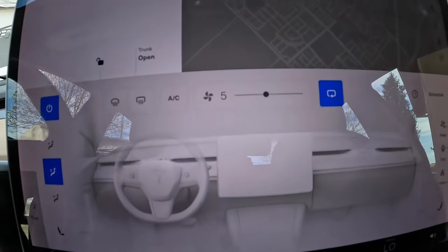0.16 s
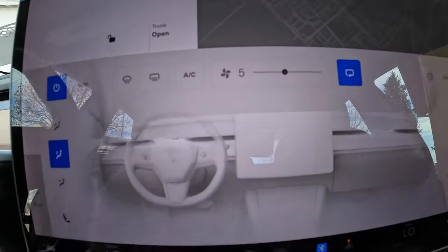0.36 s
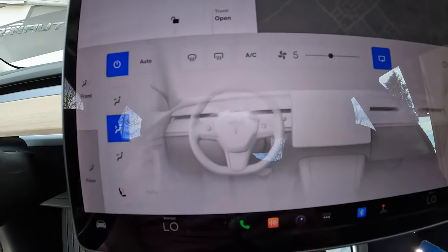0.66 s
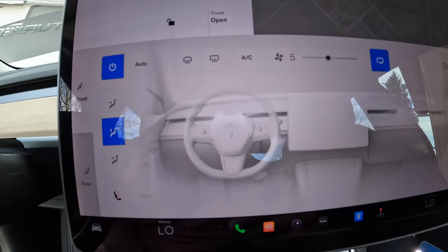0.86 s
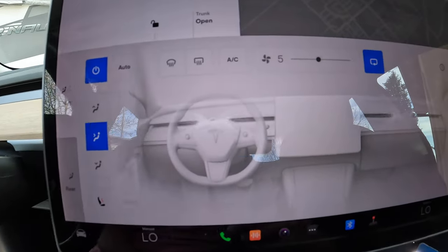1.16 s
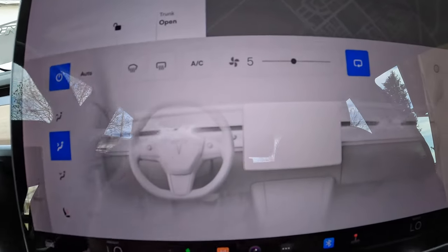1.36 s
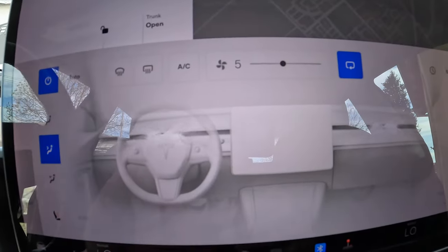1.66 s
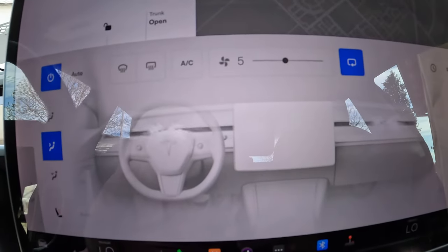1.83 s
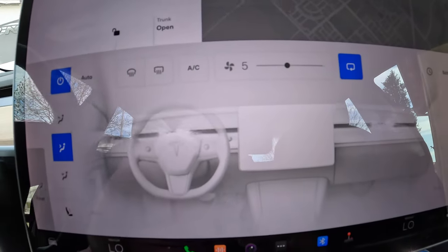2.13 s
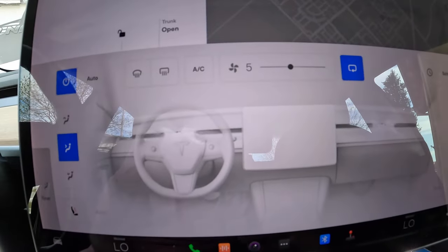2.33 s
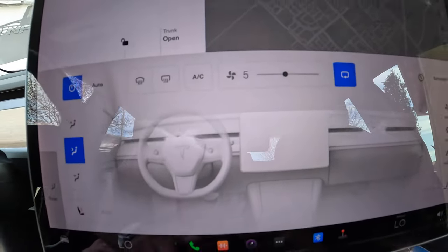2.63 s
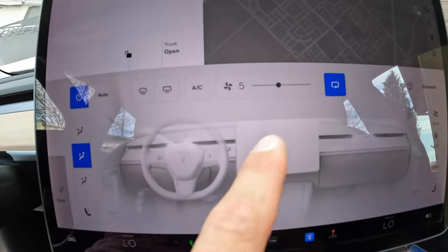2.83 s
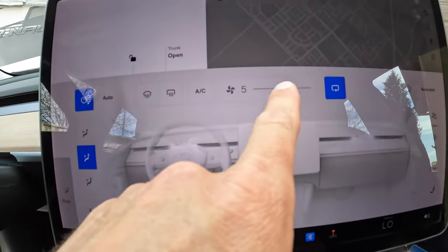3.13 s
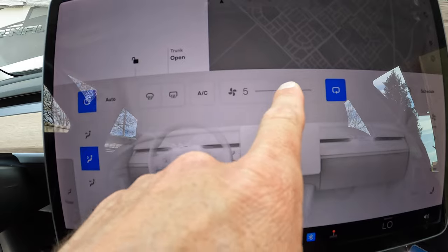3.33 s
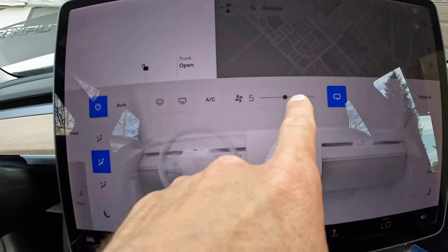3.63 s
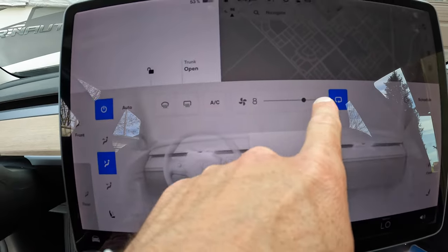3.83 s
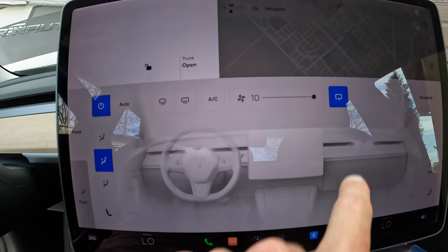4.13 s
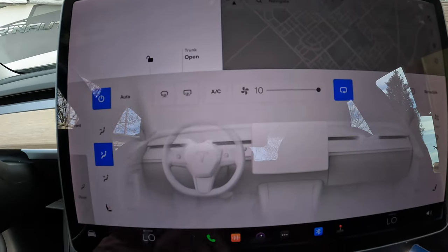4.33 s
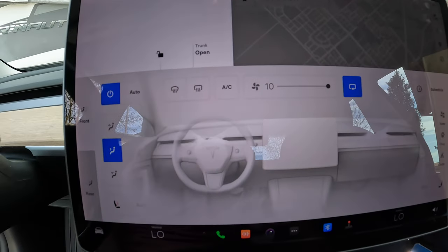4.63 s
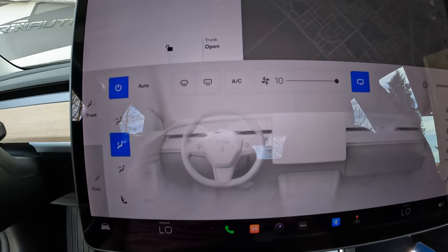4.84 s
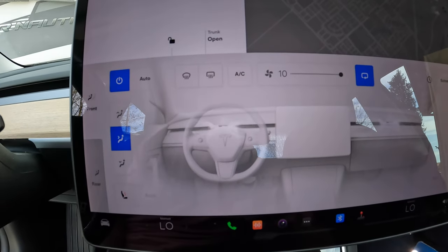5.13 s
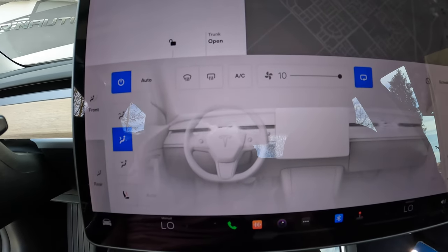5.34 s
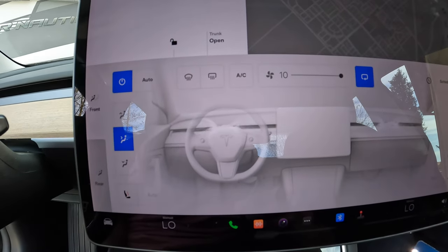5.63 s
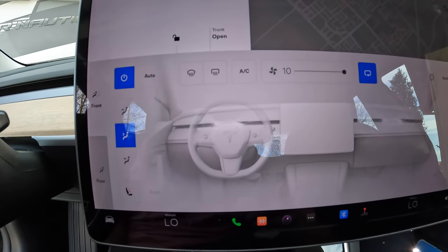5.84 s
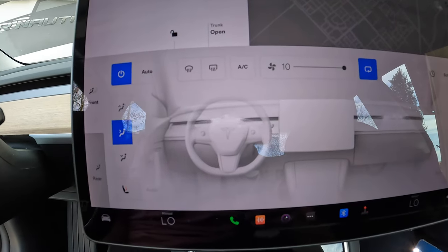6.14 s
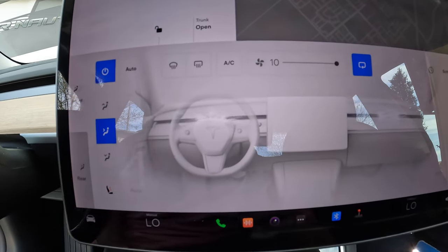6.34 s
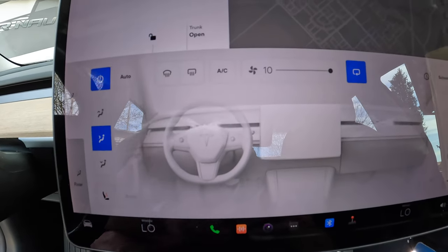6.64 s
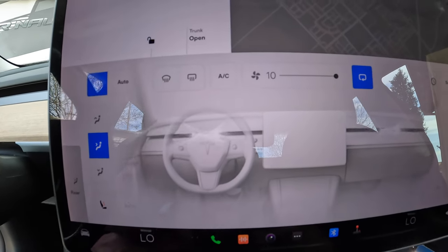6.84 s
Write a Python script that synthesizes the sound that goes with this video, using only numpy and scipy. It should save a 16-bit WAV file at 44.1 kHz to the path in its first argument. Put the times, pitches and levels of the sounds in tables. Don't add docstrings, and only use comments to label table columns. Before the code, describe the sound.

A small enclosed car cabin heard up close: boomy fan rumble and quiet air first, with muffled tyres and a sagging engine drone passing outside, plus faint thin squeaks around two and four seconds. After four seconds the blower spins up, a short hollow plastic thump follows, and much louder rushing, hissing air takes over with a rising whine.

```python
import sys
import numpy as np
from scipy import signal
from scipy.fft import irfft, next_fast_len
from scipy.io import wavfile
from scipy.ndimage import uniform_filter1d

SR = 44100
rng = np.random.default_rng(int(sys.argv[2]) if len(sys.argv) > 2 else 0)


def store_pcm(level_fs):
    pcm = np.round(np.clip(level_fs, -1, 1) * 32767).astype(np.int16)
    wavfile.write(sys.argv[1], SR, np.atleast_2d(pcm).T)


def makeup_ratio(level_db):
    decades = np.asarray(level_db, float) / 20
    return 10 ** decades


N = 308342
TIME = np.arange(N) / SR
HZ = np.maximum(np.fft.rfftfreq(next_fast_len(N), 1 / SR), 1)


def over_hz(table):
    hz, value = np.transpose(table)
    return np.interp(np.log(HZ), np.log(hz), value)


def over_time(table):
    s, value = np.transpose(table)
    return np.interp(TIME, s, value)


def walk(rate):
    hold = int(SR / rate)
    steps = np.repeat(rng.standard_normal(N // hold + 1), hold)
    return 1.3 * uniform_filter1d(uniform_filter1d(steps, hold), hold)[:N]


def colour(table):
    lo_hz, hi_hz = table[0][0], table[-1][0]
    skirt = np.minimum(1, np.minimum(HZ / lo_hz, hi_hz / HZ)) ** 8
    return makeup_ratio(over_hz(table)) * skirt


# (frequency [Hz], share of power [0-1])
PORT_LIKENESS = [(60, 1), (150, 1), (300, 0.96), (600, 0.95), (790, 0.77), (880, 0.85), (1500, 0.83),
                 (3000, 0.79), (5200, 0.77), (7000, 0.72), (8500, .5), (10700, .85), (12300, .3),
                 (14000, .7)]
# (frequency [Hz], level [dB])
PORT_LEAN = [(30, 0), (150, 0.47), (200, -0.5), (370, -0.5), (560, 1), (760, 0.5), (830, -2.5), (1000, 3),
             (1300, 0), (2000, 1.2), (4000, -0.5), (7500, 1.5), (10500, 2), (12300, 8)]
# (frequency [Hz], phase [rad])
PORT_LEAD = [(30, -0.15), (120, 0.00029), (170, -0.11), (330, 0.15), (410, -0.25), (550, -.1), (750, -0.54),
             (870, -0.47), (1500, -0.48), (2700, -0.85), (5000, -0.37), (8000, -0.0018), (13700, 0)]


def ports(shared, own):
    like = np.clip(over_hz(PORT_LIKENESS), 0, 1)
    tilt = makeup_ratio(over_hz(PORT_LEAN) / 2) * np.exp(.5j * over_hz(PORT_LEAD))
    return np.array([tilt, 1 / tilt]) * (np.sqrt(like) * shared + np.sqrt(1 - like) * own)


def air(gain, lo_hz, hi_hz, flicker_db, rate):
    chance = rng.standard_normal((2, 3, len(HZ)))
    field = chance[0] + 1j * chance[1]
    pair = ports(field[0], field[1:]) * gain
    inside = (HZ > lo_hz) & (HZ < hi_hz)
    rms = np.sqrt(np.mean(irfft(pair.mean(axis=0) * inside) ** 2))
    return irfft(pair)[:, :N] / rms * makeup_ratio(flicker_db * walk(rate))


def tone(hz, db, start_s, end_s, wobble, flutter_db, rate):
    fade = np.clip(np.minimum(TIME - start_s, end_s + .2 - TIME) / .2, 0, 1)
    phase = 2 * np.pi * np.cumsum(hz * (1 + wobble * walk(rate))) / SR
    return np.sqrt(2) * fade * makeup_ratio(db + flutter_db * walk(rate)) * np.sin(phase)


# (frequency [Hz], width [Hz], lift [dB])
VENT_RESONANCES = [(845, 35, 3), (960, 120, 1), (1410, 200, 2), (1621, 60, 3), (1806, 60, 2), (2094, 95, 3),
                   (2550, 65, 4), (2707, 75, 3), (3100, 35, 3), (3319, 40, 2.5), (3694, 55, 3),
                   (4013, 60, 3), (4218, 55, 4), (4418, 45, 3), (4903, 35, 3), (5434, 40, 3), (7480, 80, 3),
                   (10400, 600, 2)]


def vents():
    return 1 + sum((makeup_ratio(db) - 1) / (1 + (2 * (HZ - hz) / width) ** 2)
                   for hz, width, db in VENT_RESONANCES)


# (frequency [Hz], level [dB per Hz])
SHUDDER_COLOUR = [(14, -1), (25, 1), (33, -1)]


def shudder():
    return makeup_ratio(-43.5) * air(colour(SHUDDER_COLOUR), 15, 38, flicker_db=1.5, rate=2)


# (frequency [Hz], level [dB per Hz])
WASH_COLOUR = [(650, -14), (730, -6.5), (810, -5), (880, -4.5), (970, 0.5), (1150, -1.5), (1380, -3),
               (1700, -7.5), (2410, -15.5), (2850, -21.5), (3500, -25)]
# (time [s], half length [s], level [dB])
TYRE_SWELLS = [
    (1.55, 0.53, -53),
    (2.348, .15, -55.5),
    (2.9, 0.42, -49.5),
    (3.8, 0.49, -49.5),
    (4.9, .25, -55),
]
# (time [s], delay [ms])
ROAD_ECHO = [(0, 4.24), (2.5, 5.44), (3.5, 5.02), (6.99, 3.04)]


def tyre_wash():
    traffic_db, fades_s, fade_db_per_s = -54.5, 4.9, 9
    power = makeup_ratio(2 * (traffic_db - fade_db_per_s * np.maximum(TIME - fades_s, 0)))
    for s, half, db in TYRE_SWELLS:
        power = power + makeup_ratio(2 * db) * np.exp(-((TIME - s) / half) ** 2)
    wash = air(colour(WASH_COLOUR) * vents(), 800, 2200, flicker_db=.3, rate=8)
    late = TIME - (over_time(ROAD_ECHO) + .3 * walk(2.5)) / 1000
    echo = np.array([np.interp(late, TIME, port) for port in wash])
    return np.sqrt(power) * 1.177 * (wash + 0.31 * echo)


def engine():
    heard_s, near_s, leaves_s, gone_s = 1.3, 3.3, 5.0, 5.35
    far_db, near_db, gone_db = -48.5, -32.7, -51
    slowing = np.maximum(TIME - 2.75, 0)
    hz = 80 - 3.2 * slowing - 1.21 * slowing ** 2
    db = np.interp(TIME, [heard_s, near_s, leaves_s, gone_s], [far_db, near_db, near_db, gone_db])
    return tone(hz, db, heard_s, gone_s, wobble=.004, flutter_db=1.5, rate=5)


# (time [s], length [s], lowest [Hz], highest [Hz], level [dB])
CHATTER = [
    (1.89, .27, 8400, 9000, -82),
    (1.96, .17, 10500, 12400, -81),
    (4.0, .1, 11500, 12500, -83),
    (4.1, .12, 7600, 12000, -84),
]


def chatter(count=9):
    chirps = []
    for s, length, lo_hz, hi_hz, db in CHATTER:
        for when, size, pitch, glide in rng.random((count, 4)):
            chirp_s = .012 * (.7 + .6 * size)
            hz = lo_hz + (hi_hz - lo_hz) * pitch
            chirps.append((s + length * when, chirp_s, hz, 200 * (2 * glide - 1), db))
    return chirps


# (time [s], length [s], pitch [Hz], glide [Hz], level [dB])
SQUEAKS = [
    (.03, .016, 11000, -300, -78),
    (1.873, .012, 8300, 0, -77),
    (1.92, .053, 8450, 150, -71),
    (1.965, .034, 8800, 400, -74),
    (1.958, .025, 11600, 500, -79),
    (1.993, .038, 8460, -100, -73),
    (2.026, .03, 11600, -200, -80),
    (4.03, .045, 11600, 0, -82),
    (4.175, .03, 11400, 250, -84),
    (4.235, .03, 10300, -100, -82),
]


def squeaks():
    out, waver = np.zeros(N), walk(150)
    for s, length, start_hz, glide_hz, db in SQUEAKS + chatter():
        span = slice(int(s * SR), int((s + length) * SR))
        age = np.clip((TIME[span] - s) / length, 0, 1)
        hz = (start_hz + glide_hz * age) * (1 + .008 * waver[span])
        swell = np.sqrt(np.abs(np.sin(np.pi * age)))
        whistle = np.sin(2 * np.pi * np.cumsum(hz) / SR)
        out[span] += makeup_ratio(db + 3 * waver[span]) * swell * whistle
    return out


# (time [s], ring [Hz], decay by 60 dB [s], level [dB])
FLAP_RINGS = [
    (5.174, 560, 0.063, -28),
    (5.185, 404, 0.057, -27.5),
]


def flap():
    out = np.zeros(N)
    for s, hz, t60, db in FLAP_RINGS:
        age = np.maximum(TIME - s, 0)
        out += makeup_ratio(db - 60 * age / t60) * np.sin(2 * np.pi * hz * age)
    return out


# (time [s], pitch [Hz])
MOTOR_PITCH = [(4.3, 315), (4.6, 343), (4.9, 385), (5.1, 404), (5.3, 411), (6.1, 497), (6.99, 598)]
# (pitch [Hz], level [dB])
DUCT = [(315, -62), (375, -54), (412, -61), (430, -48), (478, -43.5), (503, -58), (530, -41), (562, -37)]


def motor_whine():
    hz = over_time(MOTOR_PITCH)
    db = np.interp(hz, *np.transpose(DUCT))
    start_s, end_s = MOTOR_PITCH[0][0], MOTOR_PITCH[-1][0]
    return tone(hz, db, start_s, end_s, wobble=.0015, flutter_db=1.0, rate=10)


# (time [s], gain [dB])
AIRFLOW = [
    (0, 0),
    (4.3, 0),
    (4.55, 0.5),
    (4.85, 6),
    (5.1, 7.5),
    (5.5, 7.5),
    (6.05, 8),
    (6.5, 11.5),
    (6.8, 10.5),
    (6.99, 11.5),
]
# (frequency [Hz], level [dB per Hz])
BOOM_COLOUR = [(36, -19), (44, -13.5), (52, -3.5), (60, -1), (68, -2), (77, -0.5), (86, -1), (95, -2)]
ROAR_COLOUR = [(84, -8), (95, -4.5), (110, -3.5), (131, 0), (150, -4.5), (165, -7.5), (180, -16.5),
               (200, -12), (225, -18), (255, -18.5), (285, -25), (310, -31)]
RUSH_COLOUR = [(300, 3.5), (345, -2), (390, -5), (430, -2), (470, -6.5), (500, -8), (545, -3.5), (600, -1),
               (646, -0.5), (699, -8.5), (750, -12), (850, -11.5)]
HISS_COLOUR = [(440, -34.5), (750, -11), (935, 0), (1180, -3), (1450, 0), (1720, -4.5), (2200, -6),
               (2610, -7), (2950, -10), (5310, -16), (7580, -24), (8670, -31), (10700, -34), (12400, -39),
               (14000, -45)]


def blower():
    flow_db = over_time(AIRFLOW)
    opening = np.clip((TIME - 5.09) / 0.12, 0, 1)

    def gain(half_speed_db, flow_share, open_db):
        return makeup_ratio(half_speed_db + flow_share * flow_db + open_db * opening)

    roar = gain(-36, 0.5, 11.96) * air(colour(ROAR_COLOUR), 90, 300, flicker_db=.3, rate=9)
    rush = gain(-51.5, 0.6, 7.86) * air(colour(RUSH_COLOUR), 300, 750, flicker_db=.3, rate=9)
    hiss = gain(-66, 1, 7.9) * air(colour(HISS_COLOUR) * vents(), 3000, 9000, flicker_db=.2, rate=12)
    boom = gain(-35.5, .52, 7.45) * air(colour(BOOM_COLOUR), 20, 93.3, flicker_db=2.0, rate=3.187)
    return roar + rush + hiss + boom + motor_whine()


def scene():
    return shudder() + tyre_wash() + engine() + squeaks() + flap() + blower()


def band_limit(x):
    return signal.sosfilt(signal.butter(12, 14400, fs=SR, output="sos"), x)


# (frequency [Hz], level [dB per Hz])
PORT_NOISE = [(9000, -8), (10300, 2.5), (11200, -10.5), (12000, -3.5), (12700, -3)]


def record(dry):
    hiss = makeup_ratio(-89.5) * air(colour(PORT_NOISE), 9000, 13000, flicker_db=1.0, rate=6)
    top = signal.butter(6, 13400, fs=SR, output="sos")
    rounded = np.tanh(1.3 * signal.sosfilt(top, dry + hiss)) / 1.3
    return band_limit(rounded)


dry = scene()
out = record(dry)
store_pcm(out)
```